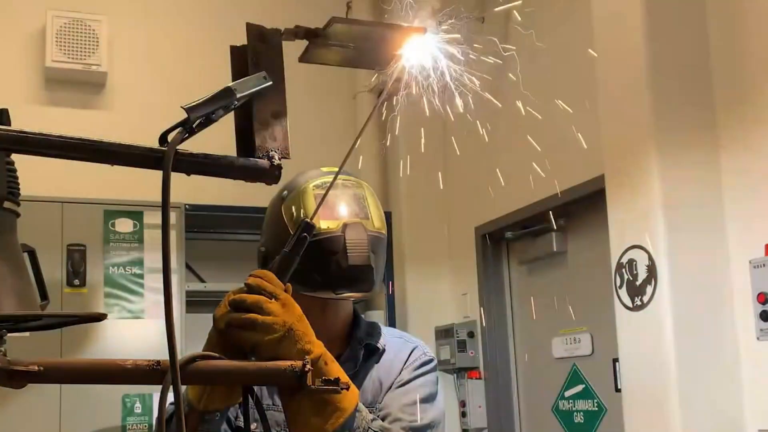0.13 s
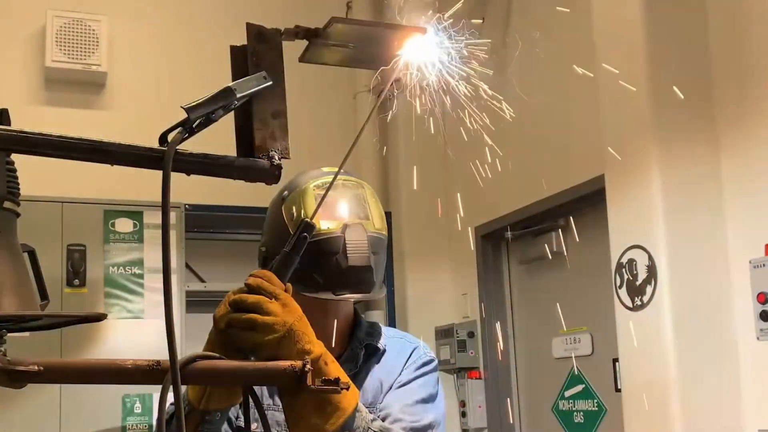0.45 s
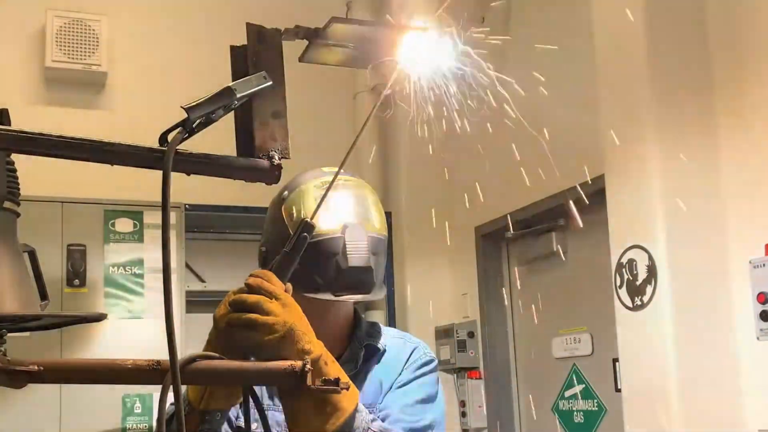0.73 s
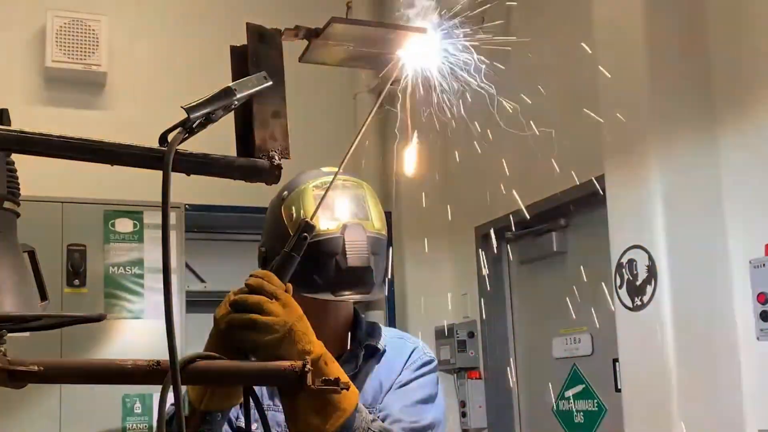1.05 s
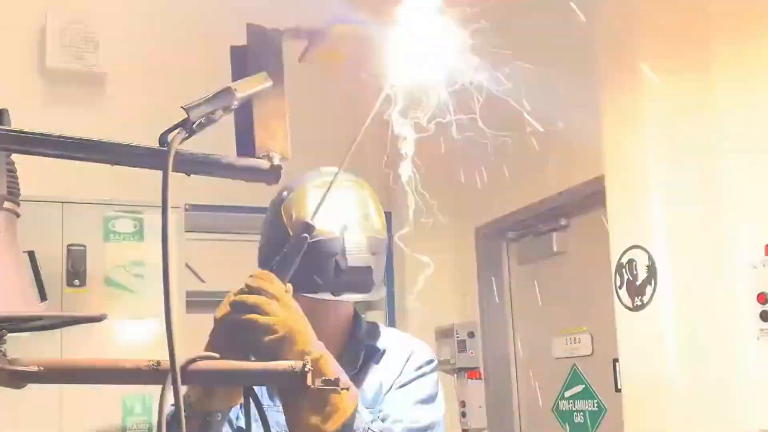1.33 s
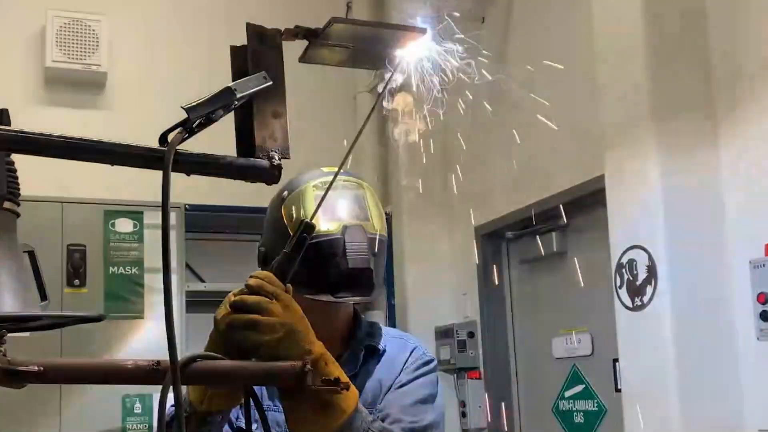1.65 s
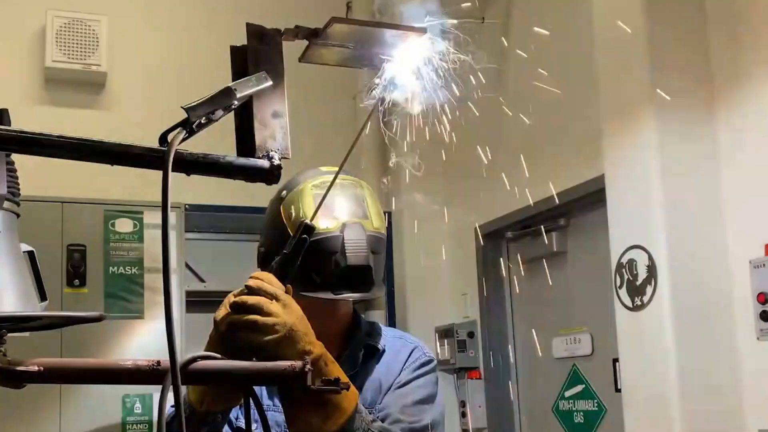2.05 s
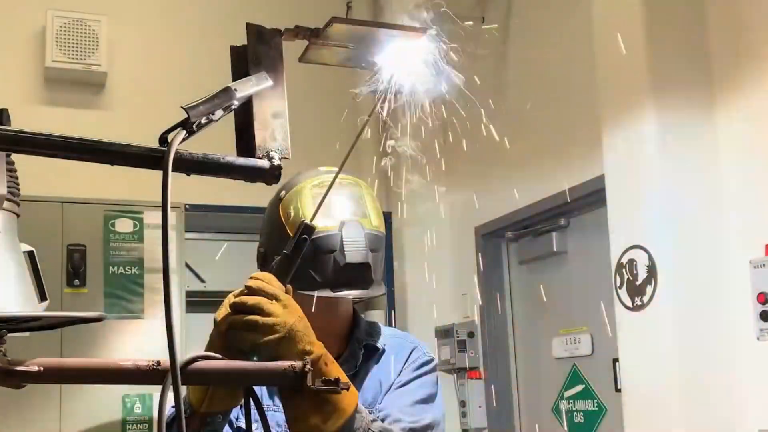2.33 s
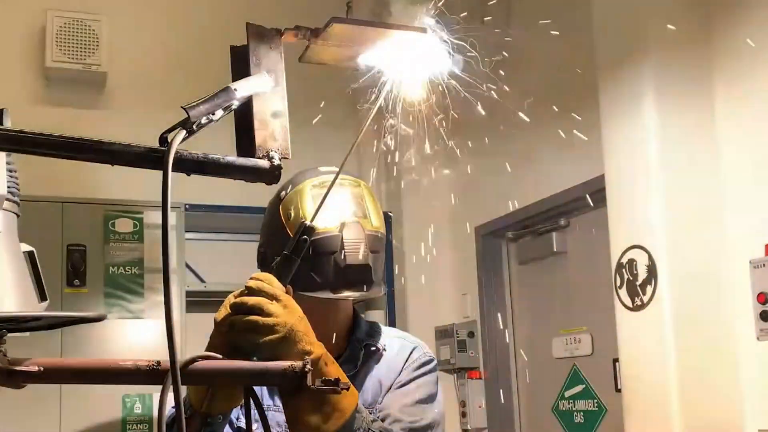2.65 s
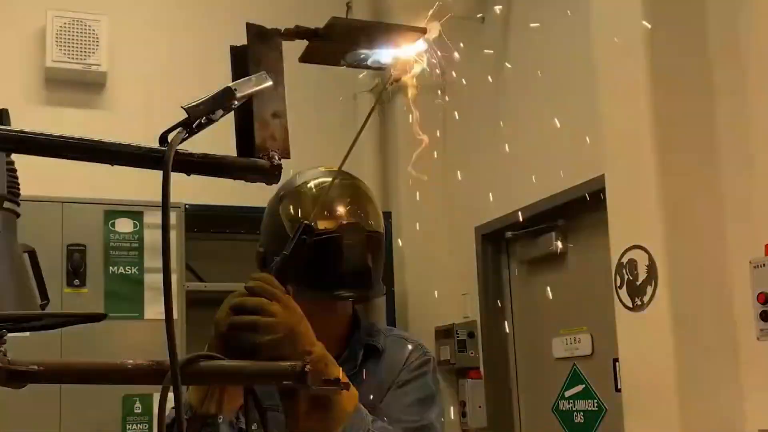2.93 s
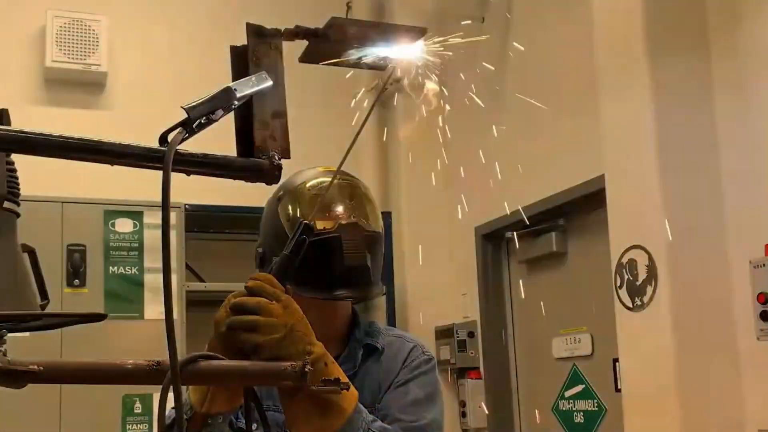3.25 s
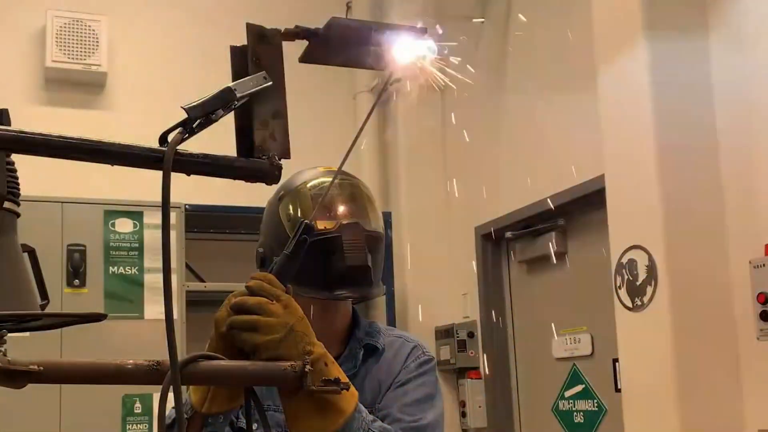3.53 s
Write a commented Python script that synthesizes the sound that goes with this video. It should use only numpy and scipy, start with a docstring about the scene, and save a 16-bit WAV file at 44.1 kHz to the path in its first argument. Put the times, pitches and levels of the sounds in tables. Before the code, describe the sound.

A welding arc crackles and sizzles steadily, with sharp snaps and a few pops.

```python
"""In a hard-walled booth, a stick-welding arc burns under a steel plate.
Countless tiny sparks crackle, larger ones snap, and spatter fizzes off in sprays.
Gas pockets in the melted metal pop, and gas squeals through it once.
The arc flares once and twice nearly shorts out; the booth rings with it over a low ventilation rumble."""
import sys
import numpy as np
from scipy import signal
from scipy.fft import rfft, irfft
from scipy.io import wavfile
from scipy.ndimage import uniform_filter1d

SR = 44100
rng = np.random.default_rng(int(sys.argv[2]) if len(sys.argv) > 2 else 0)


def transcribe(u):
    """Save the signal u as a 16-bit wav file named by the first command-line argument.

    u: samples, shape (n,) or (channels, n), limited to [-1, 1]; the rate is SR.
    q: integer samples, one column per channel.
    """
    v = np.clip(np.atleast_2d(u).T, -1, 1)
    q = np.round(v * 32767).astype(np.int16)
    wavfile.write(sys.argv[1], SR, q)


N = 163170
T = np.arange(N) / SR


def crackle():
    """The arc sputters with tiny sparks and a thin hiss, and dips when a drop of metal bridges the gap."""
    # loudness of four pitch ranges (time [s], mids [dB], treble [dB], top [dB], low body [dB])
    band_levels = [(0, -41.5, -34.5, -44, -49.5), (0.14, -50.5, -44, -46, -56),
                   (0.25, -47.5, -42.5, -52, -54), (0.35, -49, -42, -45, -56.5), (0.5, -46, -42, -53, -54),
                   (0.67, -52.5, -47.5, -58, -57.5), (0.77, -48, -41.5, -59, -53.5),
                   (0.88, -48, -45, -44, -55), (1.02, -43, -43.5, -61, -46.5), (1.2, -48, -44, -50, -50),
                   (1.48, -46, -45, -61, -49), (1.66, -49.5, -48.5, -72, -54), (1.77, -49, -47, -48, -52),
                   (1.88, -50.5, -48, -64, -54), (2.2, -48, -49, -79, -51.5), (2.46, -47, -47, -65, -53),
                   (2.57, -46, -50, -58, -43.5), (2.66, -35, -43.5, -45, -44), (2.9, -48, -47, -74, -53),
                   (3.0, -48, -44.5, -40.5, -50), (3.16, -46, -45, -45, -59), (3.31, -43, -42, -36, -54),
                   (3.46, -46, -48, -46, -62), (3.7, -48.5, -46, -54, -69)]
    # moments when the arc nearly shorts out (start [s], end [s])
    shorts = [(3.02, 3.041), (3.56, 3.57)]
    sputter_db, hiss_db, short_db, overall_db = 2.7, -8, -18, -2
    flicker = unit(uniform_filter1d(rng.standard_normal(N), size=500))
    clicks = sparks(per_s=2300, spread_db=5.3)
    hiss = amp(hiss_db) * rng.standard_normal(N)
    drive = unit(amp(sputter_db * flicker) * (clicks + hiss))
    for start, end in shorts:
        drive[(T > start) & (T < end)] *= amp(short_db)
    sound = through(drive, spark_colour(tilt_db=0))
    mids_up, treble_up, top = (above(sound, edge_hz) for edge_hz in (2460, 6700, 11430))
    bands = mids_up - treble_up, treble_up - top, top, sound - mids_up
    return amp(overall_db) * sum(unit(band) * curve(band_levels, k + 1) for k, band in enumerate(bands))


def snaps(size=1024):
    """Each large spark is one sharp click with a tiny tail of scattered noise."""
    # single large sparks (time [s], relative energy [dB], brightness [dB per octave])
    large_sparks = [(0.1316, -7, -1.5), (0.15, -9, -3), (0.2084, -11, 6), (0.222, -10.5, -8.5),
                    (0.3047, -4, -4), (0.319, -7.0, 17), (0.3934, -12, -1), (0.4019, 1.5, 0.5),
                    (0.41, -11, -1), (0.5191, -4, 4.5), (0.5223, -6.5, -5.5), (0.5791, -3.5, -0.5),
                    (0.5848, -8.5, 3), (0.7257, -2.5, 1.5), (0.7272, -9, 9), (0.7597, -12, 3),
                    (0.7944, -0.5, -2), (0.798, -4.5, 4), (0.8226, -4, 2), (0.8279, -7, 5), (0.8422, -1, 8),
                    (0.87, -9, 9), (0.8816, -8, 0.5), (0.8846, -3, 11.0), (0.921, -3.5, -12),
                    (0.9348, -3, 0), (0.949, -12, -9), (1.0753, -11, -7), (1.212, -9, -3), (1.216, -15, -6),
                    (1.245, -18, -3), (1.272, -11.5, -6), (1.3286, -12, -12), (1.409, -4, -6),
                    (1.5341, -7, -8.5), (1.549, -4, -4.5), (1.7643, -9, -9.5), (1.87, -9.5, -5),
                    (1.941, -12.5, -8.5), (1.9985, -6.5, -4), (2.004, -7.5, -10.5), (2.0114, -13, -12),
                    (2.0441, -13, -8), (2.065, -12.5, -15), (2.1281, -7.5, -9.5), (2.2433, -7, -5),
                    (2.2597, -5.5, -7), (2.2724, -5, -3), (2.2997, -15, -5), (2.3298, -11, -8),
                    (2.5463, -10, -19), (2.558, -9, -16), (2.6004, 2, -31), (2.6015, -9.5, -4),
                    (2.6066, 1.5, -36), (2.6132, -16, -15), (2.6373, -6, -18), (2.6496, -9, -17),
                    (2.661, -5, -17), (2.6955, -11, -14), (2.7924, -8, 2), (2.795, -6, 5), (2.808, -10, -8),
                    (2.8117, -5, -4), (3.0416, 1.5, 2.5), (3.0653, -5, -1), (3.187, -9.5, 0),
                    (3.2935, -7.5, 5), (3.3205, -8, 3), (3.3348, -1, 6), (3.3644, -6, -1), (3.448, -8, 1.5),
                    (3.5714, -6.5, -5), (3.5994, -7.5, -8)]
    overall_db, scatter_db, scatter_s = -2, -2, 0.00066
    out, t = np.zeros(N), np.arange(size) / SR
    for start, db, tilt_db in large_sparks:
        scatter = rng.standard_normal(size) * np.exp(-t / scatter_s) * (t > 0)
        spike = (t == 0) + amp(scatter_db) * scatter / np.linalg.norm(scatter)
        click = through(spike, spark_colour(tilt_db))
        add(out, start, amp(db + overall_db) * click / np.linalg.norm(click))
    return out


def sprays(size=12000, rise_s=0.001):
    """Fine spatter flies off in a dense fizz that starts at once and dies away."""
    # sprays of spatter (time [s], level [dB], fade time [s], brightness [dB per octave],
    # whistle boost [dB], whistle pitch [Hz])
    spatter = [(0.402, -29.5, 0.017, 3.5, 18, 5650), (0.795, -34, 0.0099, 1, 17, 5700),
               (0.932, -30, 0.042, -26, 2, 5300), (1.069, -34, 0.029, -13.5, 7, 5000),
               (1.211, -32, 0.011, -7, 20, 5500), (1.998, -34, 0.023, -12, 1, 4400),
               (2.252, -28.5, 0.022, -5, 18, 5470), (2.605, -28, 0.02, -35, 3, 4500),
               (3.042, -28, 0.038, 1, 7, 5330), (3.574, -39, 0.036, 5, 10, 5250)]
    out, t = np.zeros(N), np.arange(size) / SR
    for start, db, fade_s, tilt_db, whistle_db, whistle_hz in spatter:
        clicks = sparks(per_s=14000, spread_db=2.0)[:size]
        fizz = through(clicks, spark_colour(tilt_db, whistle_db, whistle_hz))
        add(out, start, amp(db) * fizz * (1 - np.exp(-t / rise_s)) * np.exp(-t / fade_s))
    return out


def pops(size=10000):
    """A gas pocket bursts: a pressure shock, down then up, followed by a low thump and a puff of gas."""
    # bursts in the melted metal (time [s], shock level [dB], shock width [s], puff level [dB],
    # puff rise [s], puff fade [s], puff's upper edge [Hz], thump level [dB])
    bursts = [(0.928, -28, 0.00027, -32, 0.0041, 0.049, 2100, -37),
              (0.9344, -21, 0.00022, -31, .001, 0.0054, 1500, -37),
              (.95, -18.5, 0.00014, -33, 0.0028, 0.022, 990, -32),
              (1.409, -27, 0.00019, -34.5, 0.0035, 0.023, 1600, -50),
              (1.548, -26, 0.00016, -34, .003, 0.023, 1920, -52),
              (1.554, -27.5, 0.00045, -31.5, .002, .014, 480, -43),
              (2.0042, -5.5, 0.00016, -23.5, .001, 0.0036, 1700, -24.5),
              (2.0114, -14, 0.00018, -15.5, 0.00089, 0.0042, 1700, -43),
              (2.02, -28, .00016, -27.5, 0.0023, 0.024, 2700, -60),
              (2.445, -38.5, 0.00029, -46, .001, 0.0071, 800, -58),
              (2.601, -17, 0.00014, -22, 0.0011, 0.0038, 2200, -28),
              (2.6073, -13, 0.00013, -26, 0.0013, 0.0055, 2000, -29),
              (2.7064, -21.5, .00015, -37, .001, 0.0046, 2000, -60),
              (3.2251, -26.5, 0.00022, -40, .001, 0.0043, 950, -49),
              (3.229, -29, 0.0004, -35, 0.00092, 0.011, 844, -40)]
    thump_hz, thump_s, lead_s = 125, 0.0054, 0.002
    out, t = np.zeros(N), np.arange(size) / SR
    for start, shock_db, width_s, puff_db, rise_s, fade_s, edge_hz, thump_db in bursts:
        swing = (t - lead_s) / width_s  # passes through zero at the moment of the burst
        add(out, start - lead_s, amp(shock_db) * swing * np.exp((1 - swing ** 2) / 2))
        add(out, start, amp(thump_db) * np.sin(2 * np.pi * thump_hz * t) * np.exp(-t / thump_s))
        puff = rng.standard_normal(size) * (1 - np.exp(-t / rise_s)) * np.exp(-t / fade_s)
        add(out, start, amp(puff_db) * through(puff, gas_colour(edge_hz)))
    return out


def flare():
    """The arc flares up: a swelling roar of gas with thick sizzle on top."""
    # rise and fall of the flare (time [s], roar level [dB], sizzle level [dB])
    swell = [(2.69, -77, -68), (2.71, -39, -40.5), (2.745, -35, -34), (2.792, -36, -29),
             (2.815, -47.5, -39.5), (2.85, -53.5, -55)]
    roar = through(rng.standard_normal(N), gas_colour(edge_hz=2100))
    sizzle = through(sparks(per_s=5200, spread_db=5.5), spark_colour(tilt_db=-6.5))
    return roar * curve(swell, column=1) + sizzle * curve(swell, column=2)


def squeal(start_s=1.9948, length_s=0.0058, hz=1400, db=-18):
    """Gas forces its way through the melted metal in a brief tone, just before the largest pop."""
    out, t = np.zeros(N), np.arange(0, length_s, 1 / SR)
    arch = np.sqrt(abs(np.sin(np.pi * t / length_s)))
    add(out, start_s, amp(db) * np.sin(2 * np.pi * hz * t) * arch)
    return out


def booth(sound, size=30000):
    """The hard walls throw back a dense wash of echoes, and the booth rings at a few pitches."""
    # how long the echoes last (pitch [Hz], time to fade by 60 dB [s])
    echo_times = [(150, 0.1), (500, 0.24), (1400, 0.5), (4000, 0.5), (9000, 0), (16000, 0.5)]
    # how strong the echoes are (pitch [Hz], level [dB])
    echo_levels = [(100, -2), (500, -9.5), (1500, -8), (4500, -6.5), (9000, -12), (16000, -11)]
    # ringing of the booth and its steelwork (pitch [Hz], energy [dB], time to fade by 60 dB [s])
    rings = [(120, -40, .12), (372, -34, .18), (450, -33, .12), (600, -32, .13), (682, -35, .6),
             (1056, -24, .12), (1183, -27, .13), (1418, -37, .25), (1485, -33, .5), (1732, -32, .2),
             (1886, -31, .3), (4465, -36, .2)]
    echoes_per_s, first_echo_s = 5000, 0.004
    t = np.arange(size) / SR
    echoes = rng.standard_normal(size) * (rng.random(size) < echoes_per_s / SR) * (t > first_echo_s)
    hz, frame_s, bands = signal.stft(unit(echoes), SR, nperseg=256)  # each pitch fades at its own rate
    fade_rate = np.log(1000) / read(echo_times, hz)[:, None]
    fade = np.exp(-fade_rate * frame_s) * np.sqrt(2 * fade_rate / SR)  # longer fades start softer
    bands = bands * amp(read(echo_levels, hz))[:, None] * fade
    tail = signal.istft(bands, SR, nperseg=256)[1][:size]
    for ring_hz, db, ring_s in rings:
        ring = np.cos(2 * np.pi * ring_hz * t) * np.exp(-np.log(1000) * t / ring_s)
        tail += amp(db) * ring / np.linalg.norm(ring)
    return through(sound, tail)


def rumble(level_db=-48):
    """The ventilation makes a steady low noise."""
    # tone colour of the ventilation (pitch [Hz], relative level [dB])
    colour = [(10, -0.5), (24, 1.5), (40, -4.5), (55, -13), (75, -15.5), (120, -20), (170, -23), (400, -29),
              (1200, -32), (4000, -38.5)]
    gain = amp(read(colour, np.fft.rfftfreq(N, 1 / SR)))
    return amp(level_db) * unit(irfft(rfft(rng.standard_normal(N)) * gain, N))


def sparks(per_s, spread_db):
    """Sparks as random clicks: many faint, few strong."""
    strength = amp(spread_db * np.minimum(rng.exponential(1, N), 3.5))  # the cap tames the loudest
    return unit(strength * rng.choice([-1, 1], N) * (rng.random(N) < per_s / SR))


def spark_colour(tilt_db, whistle_db=0, whistle_hz=0):
    """Filter that makes a click sound like a spark, brighter or duller, with an optional whistle."""
    # tone colour of a spark (pitch [Hz], relative level [dB])
    colour = [(100, -21), (400, -10), (800, -15), (1300, -9), (2200, -13), (3200, -11), (4300, -5),
              (5200, -3), (6300, -7), (7500, 1), (8800, 2), (10600, 2), (11900, 0.5), (13400, 5.5),
              (14800, 3.5), (16000, -22)]
    tilt_from_hz, pivot_hz, whistle_width_hz = 4460, 8500, 850

    def shape_db(hz):
        tilt = tilt_db * np.log2(np.maximum(hz, tilt_from_hz) / pivot_hz)
        whistle = whistle_db * np.exp(-((hz - whistle_hz) / whistle_width_hz) ** 2)
        return read(colour, hz) + tilt + whistle
    return response(shape_db)


def gas_colour(edge_hz):
    """Filter that makes noise sound like rushing gas, falling steeply above edge_hz."""
    # tone colour of rushing gas (pitch [Hz], relative level [dB])
    colour = [(40, 2.5), (115, -13.5), (200, -4.5), (300, -1), (430, 2.5), (800, -1), (1200, 3.5),
              (2000, 0.5), (4000, 2), (16000, -32)]
    return response(lambda hz: read(colour, hz) - 10 * np.log10(1 + (hz / edge_hz) ** 6))


def response(shape_db, size=2048):
    """Builds a filter of energy 1 with the tone colour shape_db(hz)."""
    hz = abs(np.fft.fftfreq(size, 1 / SR))
    log_gain = np.log(amp(np.maximum(shape_db(hz), -100)))
    spectrum = np.exp(np.conj(signal.hilbert(log_gain)))  # packs the energy at the start: clicks stay sharp
    pulse = np.fft.ifft(spectrum).real[:size // 2]
    return pulse / np.linalg.norm(pulse)


def through(x, pulse):
    """Filters x, keeping its length."""
    return signal.fftconvolve(x, pulse)[:len(x)]


def above(x, edge_hz):
    """The part of x above a soft edge in pitch."""
    return irfft(rfft(x) * (1 + np.tanh((np.fft.rfftfreq(N, 1 / SR) - edge_hz) / 800)) / 2, N)


def amp(db):
    """Turns decibels into a gain."""
    return 10 ** (np.asarray(db) / 20)


def unit(x):
    """Scales x to an average strength (rms) of 1."""
    return x / np.sqrt(np.mean(x ** 2) + 1e-20)


def read(table, hz):
    """Looks up a pitch in a table, gliding between rows on a log scale."""
    pitches, values = np.transpose(table)
    return np.interp(np.log(hz + 1), np.log(pitches + 1), values)


def curve(table, column):
    """Gain over time from one dB column of a table."""
    table = np.array(table)
    return amp(np.interp(T, table[:, 0], table[:, column]))


def add(mix, start_s, sound):
    """Mixes a sound in at the given time."""
    part = mix[max(round(start_s * SR), 0):][:len(sound)]
    part += sound[:len(part)]


def scene():
    """The arc, its echoes in the booth and the ventilation, in one channel."""
    arc = crackle() + snaps() + sprays() + pops() + flare() + squeal()
    return (arc + booth(arc) + rumble())[None]


def record(dry, cutoff_hz=16300):
    """Takes away the very highest treble."""
    low_pass = signal.firwin(255, cutoff_hz, window=("kaiser", 9), fs=SR)
    return signal.oaconvolve(dry, low_pass[None], "same")


dry = scene()
out = record(dry)
transcribe(out)
```